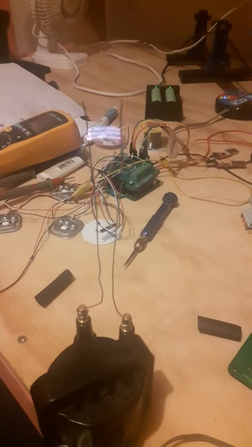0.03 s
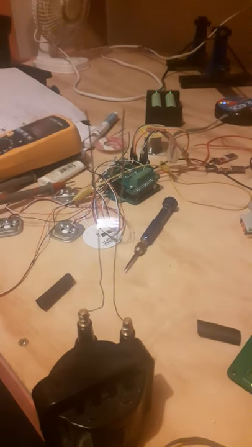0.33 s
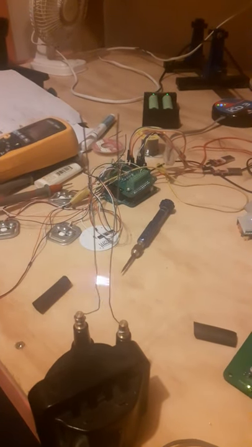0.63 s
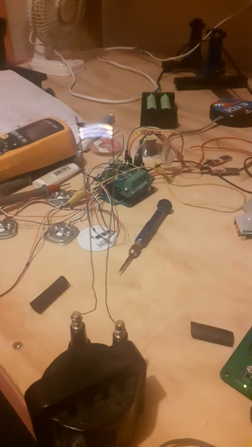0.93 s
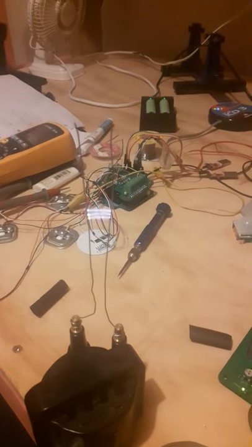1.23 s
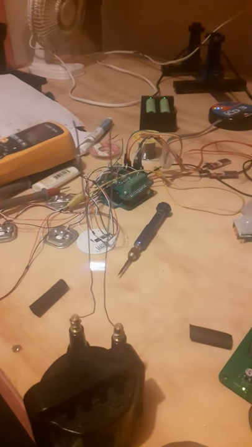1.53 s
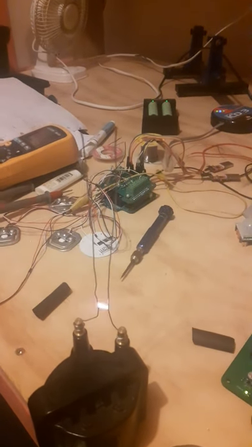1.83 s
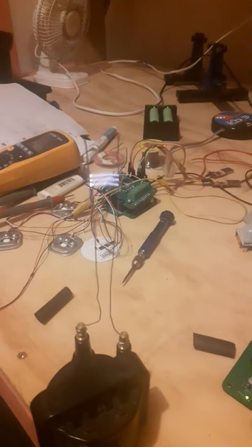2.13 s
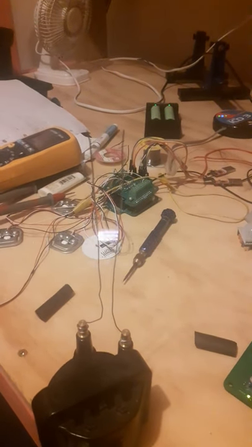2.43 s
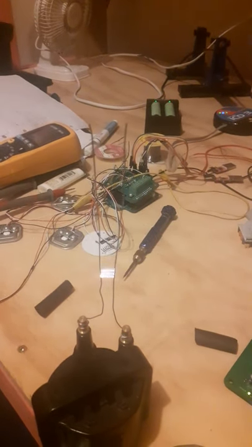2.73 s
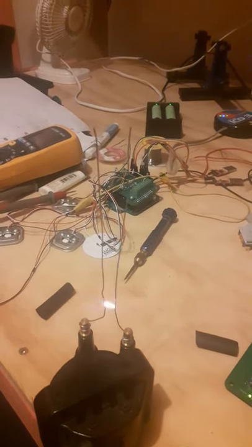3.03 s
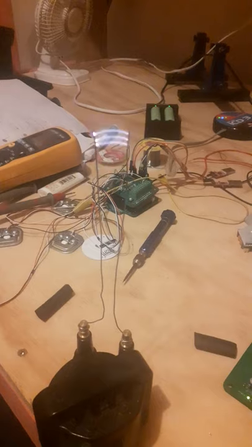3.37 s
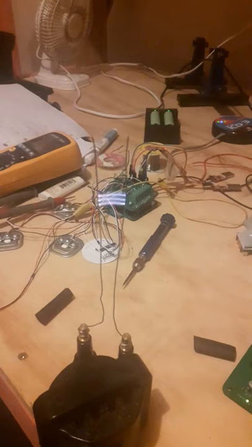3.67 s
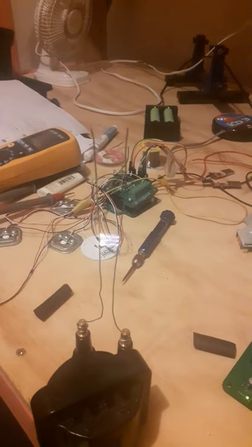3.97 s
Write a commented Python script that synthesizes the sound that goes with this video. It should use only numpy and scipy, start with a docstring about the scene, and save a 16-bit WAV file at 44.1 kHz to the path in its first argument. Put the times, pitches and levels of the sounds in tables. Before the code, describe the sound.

An electric arc buzzes harshly, swelling and breaking with a soft puff again and again.

```python
"""A workbench in a small room: an electric arc climbs two diverging wires, breaks at the top and
restrikes at the foot. Each supply pulse fires one sharp spark, 150 a second: a buzz that grows as
the arc lengthens and ends in a soft puff. Bench echoes lag more as the arc rises, so the buzz
phases. The left microphone is near, the right far and shaded. Room noise and a low hum lie behind."""
import sys
import numpy as np
from scipy import signal
from scipy.fft import rfft, irfft
from scipy.io import wavfile
from scipy.ndimage import uniform_filter1d

SR = 44100
rng = np.random.default_rng(int(sys.argv[2]) if len(sys.argv) > 2 else 0)


def transcribe(signal):
    """Save signal, clipped to [-1, 1], as a 16-bit WAV file at the path in sys.argv[1]."""
    frames = np.atleast_2d(signal).T
    limited = np.clip(frames, -1, 1)
    pcm = np.round(limited * 32767).astype(np.int16)
    wavfile.write(sys.argv[1], SR, pcm)


N = 176400
DIFFUSE_LOW_CUT_HZ = 536  # clutter and room share of the buzz

# arc breaks at the top: time_s, relative_puff_db
BREAKS = [(0.17, -22), (0.612, -24), (1.046, -25.5), (1.465, -27.5), (1.878, -28), (2.284, -26),
          (2.684, -27), (3.069, -28.5), (3.454, -27.5), (3.834, -29.5)]


def sparks(count=602, rate_hz=150.225, drift_hz_per_s=.046):
    """One spark per supply pulse: time_s, height (0 foot, 1 top), gain."""
    # spark strength along the wires: height, level_db
    strength = [(0, -2.5), (.05, -6), (.13, -1), (.23, -2.5), (.42, 0), (.6, 3), (1, 3)]
    first_spark_s, first_strike_s, last_break_s = .00213, -.28, 4.21
    restrike_lag_s, jitter_s, flicker_db = .00021, 2e-6, .4
    t = first_spark_s + np.arange(count) / rate_hz
    t = t - drift_hz_per_s * t ** 2 / (2 * rate_hz)
    ends_s = np.array([first_strike_s, *np.transpose(BREAKS)[0], last_break_s])
    climb, height = np.divmod(np.interp(t, ends_s, np.arange(len(ends_s))), 1)
    jitter, flicker, wobble = rng.standard_normal((3, count))
    wander = unit(uniform_filter1d(uniform_filter1d(wobble, size=9), size=7))  # no two climbs alike
    gain = amp(np.interp(height, *np.transpose(strength)) + flicker_db * flicker)
    return t + climb * restrike_lag_s + jitter_s * jitter, height + .022 * wander, gain


def arc(t, height, gain):
    """Stereo buzz; the far microphone hears each spark later, more so as the arc rises."""
    # echoes off the bench, wall and nearby objects: foot_delay_ms, top_delay_ms, gain
    left_echoes = [(.17, .72, -.23), (.43, .99, .3), (.44, 1.06, .06), (.89, 1.35, -.07),
                   (1.24, 1.61, -.07), (1.5, 1.6, -.07), (1.8, 2.22, -.08), (5.04, 5.22, .1),
                   (5.105, 5.3, -.08), (5.45, 5.93, .07)]
    right_echoes = [(.97, 1.08, -.11), (1.22, 1.85, .08), (1.84, 1.98, -.13), (2.275, 2.545, -.15),
                    (2.73, 2.94, .13), (3.17, 3.44, .13), (4.24, 4.55, -.11), (4.51, 4.775, .11),
                    (4.94, 5.42, .12)]
    # spark spectrum: freq_hz, level_db
    left_spectrum = [(150, 3.5), (300, 1), (450, 0.5), (600, 0), (750, 0), (900, -1.5), (1050, -4.5),
                     (1250, -13.5), (1650, -6.5), (1950, -2), (2250, -3), (2450, -3), (3500, -1.5),
                     (4500, -1.5), (6200, 1), (7600, -1.5), (9300, -14), (11000, -5.5), (12800, -3),
                     (15700, -1)]
    right_spectrum = [(150, 1), (300, 0.5), (450, 3), (600, -2), (750, 0.5), (900, 3.5), (1050, -6.5),
                      (1250, -11.5), (1650, -3), (1950, 4.5), (2250, -7.5), (2450, 5), (3500, 2),
                      (4500, -3), (6200, -13), (7600, -14.5), (9300, -15), (11000, -16), (12800, -14.5),
                      (15700, -0.5)]
    # colour change from short arc to long: freq_hz, gain_db
    left_swell = [(300, 2.5), (1000, -1), (2000, .3), (3400, 2.5), (6000, .3), (9500, 1), (14000, 2.5)]
    right_swell = [(300, 4.5), (1000, 3.5), (2000, -5.55), (3400, 3.5), (6000, 0), (9500, -12),
                   (14000, -12.5)]
    far_t = t + (.065 + .22 * height) / 1000
    left = buzz(t, height, gain, left_echoes, left_spectrum, left_swell, level_db=-21.5, room_db=-16)
    right = buzz(far_t, height, gain, right_echoes, right_spectrum, right_swell, level_db=-29, room_db=-12)
    return np.array([left, shade(right)])


def buzz(t, height, gain, echoes, spectrum, swell, level_db, room_db, smear=.19):
    """Sparks reach one microphone directly, off the bench, off clutter and through the room."""
    slide = abs(height[:, None]) ** 1.15

    def arrive(paths):
        """Path delays slide with arc height."""
        foot_ms, top_ms, share = np.transpose(paths)
        delay_ms = foot_ms + (top_ms - foot_ms) * slide
        return clicks(t[:, None] + delay_ms / 1000, gain[:, None] * share)

    pulses = arrive([(0, 0, 1), *echoes]) + low_cut(arrive(clutter()), DIFFUSE_LOW_CUT_HZ)
    rise = np.interp(np.arange(N) / SR, t, height)
    dry = colour(pulses * (1 - rise), [spectrum]) + colour(pulses * rise, [spectrum, swell])
    dry = signal.lfilter([-smear, 1], [1, -smear], dry)  # all-pass
    tail = room(low_cut(dry, DIFFUSE_LOW_CUT_HZ))
    return amp(level_db) * unit(dry + amp(room_db) * tail)


def puffs(t, pitch_hz=185, width_hz=260, rise_s=.008, boost_db=13, right_db=-20, room_db=-19.5):
    """The last sparks of an overstretched arc each push out a pulse of air; bigger puffs reach deeper."""
    age_s = np.arange(SR // 20) / SR
    push = -np.cos(2 * np.pi * pitch_hz * age_s) * np.exp(-np.pi * width_hz * age_s)
    smallest_db = min(db for _, db in BREAKS)
    dry = np.zeros(N)
    for break_s, db in BREAKS:
        before_s, kicks = t[t < break_s], np.zeros(N)
        kicks[(before_s * SR).astype(int)] = amp(db + boost_db) * np.exp((before_s - break_s) / rise_s)
        dry += low_cut(kicks, hz=80 * amp(.6 * (smallest_db - db)))
    dry = signal.oaconvolve(dry, push)[:N]
    return np.array([dry, amp(right_db) * dry]) + amp(room_db) * np.array([room(dry), room(dry)])


def clutter(count=48, spread_ms=9, shift_ms=.45, fade_ms=6, level_db=-16):
    """Weak echoes off scattered objects: foot_delay_ms, top_delay_ms, gain."""
    offset, shift, sign = rng.random((3, count))
    foot_ms = .5 + spread_ms * (np.arange(count) + offset) / count
    top_ms = foot_ms + shift_ms * (.5 + shift)
    scatter = np.sign(sign - .5) * np.exp(-foot_ms / fade_ms)
    return np.c_[foot_ms, top_ms, amp(level_db) * scatter / np.linalg.norm(scatter)]


def shade(x):
    """Two bands reach the shaded microphone late: phase turns, level stays."""
    # delayed bands: centre_hz, width_hz
    detours = [(322, 60.5), (1300, 532)]
    for centre_hz, width_hz in detours:
        x = x - 2 * signal.lfilter(*signal.iirpeak(centre_hz, centre_hz / width_hz, SR), x)
    return x


def room(x, size=16384, gap_s=.0024):
    """Diffuse tail that dies sooner in the treble."""
    # room decay: freq_hz, t60_s
    decay = [(150, 0.64), (1000, 1), (5000, 0.22), (15000, 0.41)]
    taps = rng.standard_normal(size) * np.clip(np.arange(size) / SR / gap_s - 1, 0, 1)
    hz, t, bands = signal.stft(taps, SR, nperseg=256)
    fade = amp(-60 * t / read(decay, hz)[:, None])
    tail = signal.istft(bands * fade, SR, nperseg=256)[1]
    return signal.oaconvolve(x, tail / np.linalg.norm(tail))[:N]


def background(air_db=-45, hum_hz=119.8, hum_db=-60.5):
    """Faint room noise and a steady low hum."""
    # room noise spectrum: freq_hz, density_db
    air = [(20, -35), (55, -9), (95, -6.5), (220, -7), (500, -8.5), (1200, -5), (5000, 2), (16000, -12.5)]
    hz = np.fft.rfftfreq(N, 1 / SR)
    shared, left, right = irfft(rfft(rng.standard_normal((3, N))) * amp(read(air, hz)), N)
    hum = np.sin(2 * np.pi * hum_hz * np.arange(N) / SR)
    return amp(air_db) * unit(shared + .4 * np.array([left, right])) + amp(hum_db) * unit(hum)


def clicks(times_s, gains, oversample=4):
    """Impulses at sub-sample times."""
    size = N * oversample
    at, gains = times_s.ravel() * SR * oversample, gains.ravel()
    inside = (at >= 0) & (at < size - 1)
    whole, part, gains = at[inside].astype(int), at[inside] % 1, gains[inside]
    fine = np.bincount(whole, gains * (1 - part), size) + np.bincount(whole + 1, gains * part, size)
    return signal.resample_poly(fine, 1, oversample) * oversample


def colour(x, spectra, low_cut_hz=279, size=4096):
    """Minimum-phase filter: spectra in series, plus a bass roll-off."""
    hz = abs(np.fft.fftfreq(size, 1 / SR))
    roll_off = (hz ** 2 + 10) / (hz ** 2 + low_cut_hz ** 2)
    log_gain = np.log(amp(sum(read(points, hz) for points in spectra)) * roll_off)
    kernel = np.fft.ifft(np.exp(signal.hilbert(log_gain).conj())).real
    return signal.oaconvolve(x, kernel[:size // 2])[:N]


def low_cut(x, hz):
    """Second-order high-pass."""
    return signal.sosfilt(signal.butter(2, hz, "high", fs=SR, output="sos"), x + 1e-12)


def read(points, hz):
    """Table lookup on a log-frequency axis."""
    freq_hz, value = np.transpose(points)
    return np.interp(np.log(hz + 1), np.log(freq_hz + 1), value)


def amp(db):
    """Decibels to gain."""
    return 10 ** (np.asarray(db) / 20)


def unit(x):
    """Scale to rms 1."""
    return x / np.sqrt(np.mean(x ** 2) + 1e-20)


def scene():
    """Arc and puffs over the background."""
    t, height, gain = sparks()
    return arc(t, height, gain) + puffs(t) + background()


def record(dry):
    """Steep low-pass."""
    edge_hz = 15900
    kernel = signal.firwin(511, edge_hz, window=("kaiser", 9), fs=SR)
    return signal.oaconvolve(dry, kernel[None], "same")


dry = scene()
out = record(dry)
transcribe(out)
```